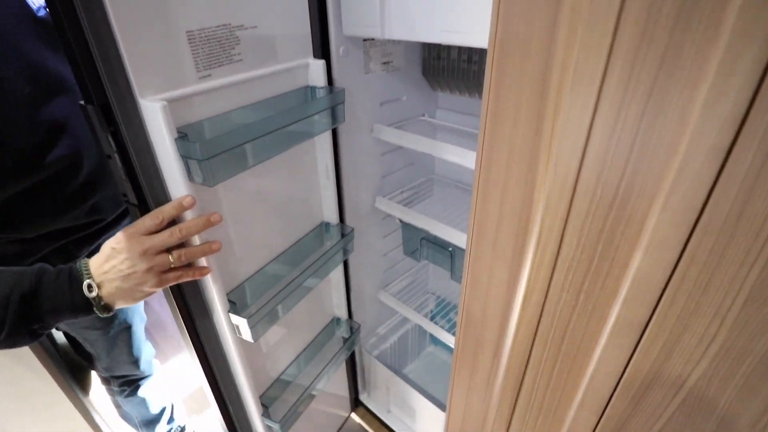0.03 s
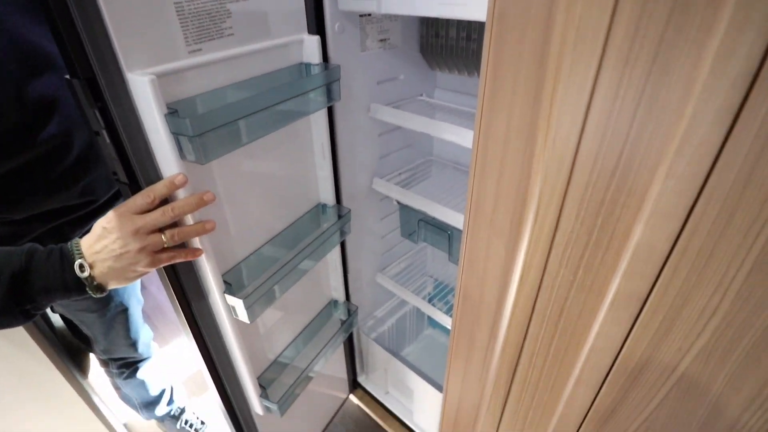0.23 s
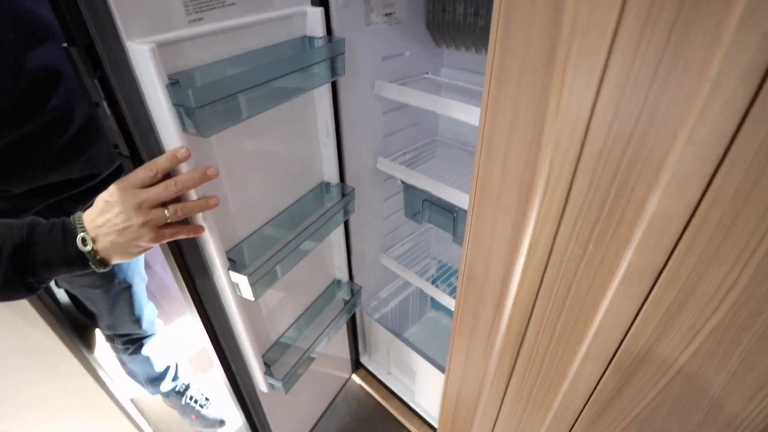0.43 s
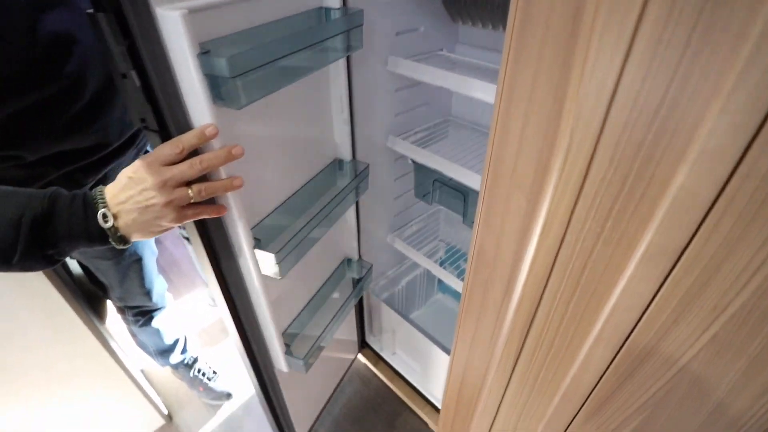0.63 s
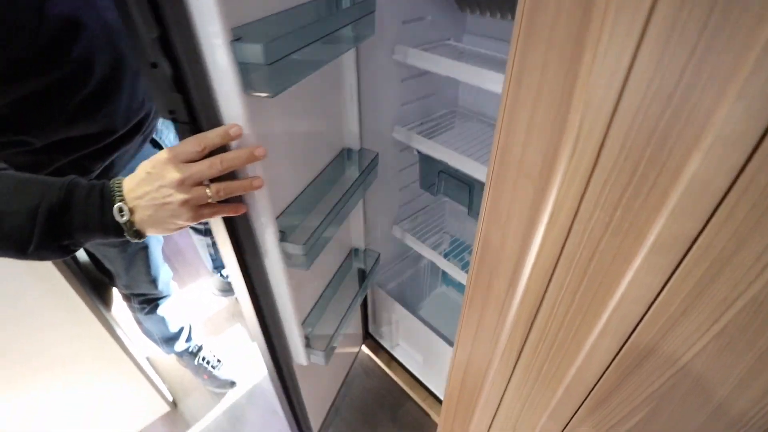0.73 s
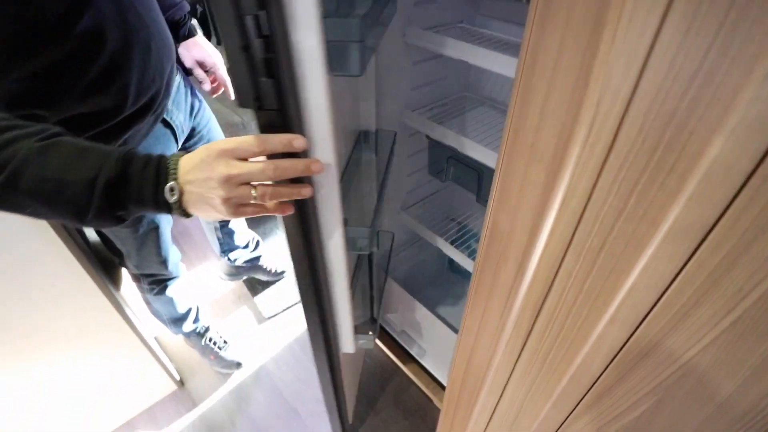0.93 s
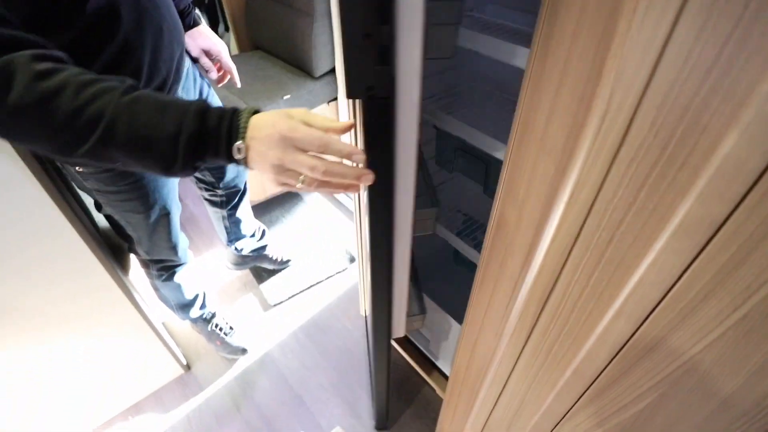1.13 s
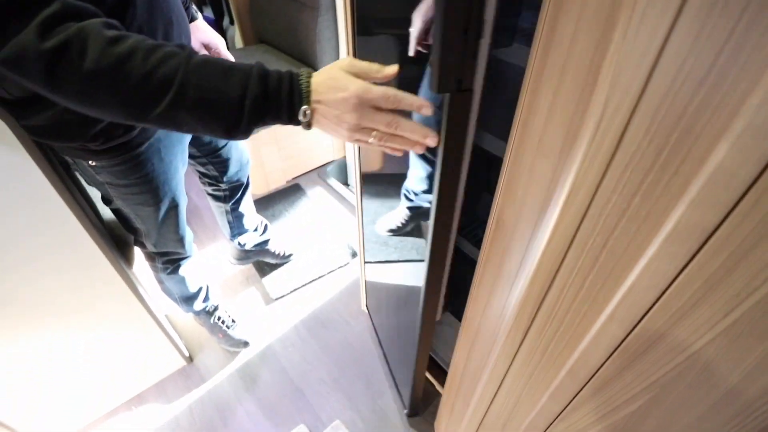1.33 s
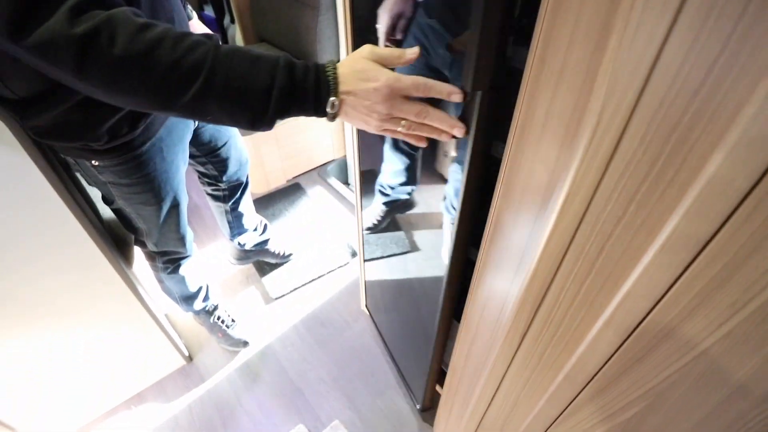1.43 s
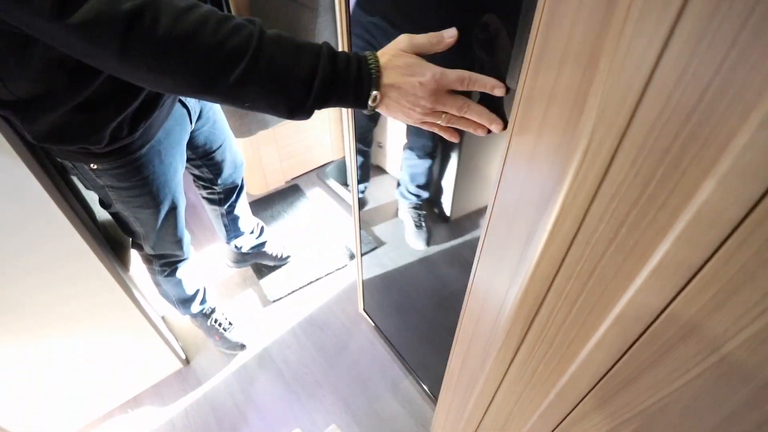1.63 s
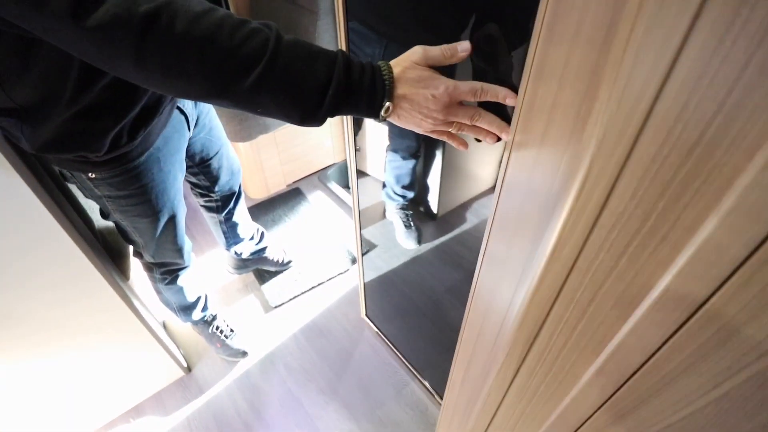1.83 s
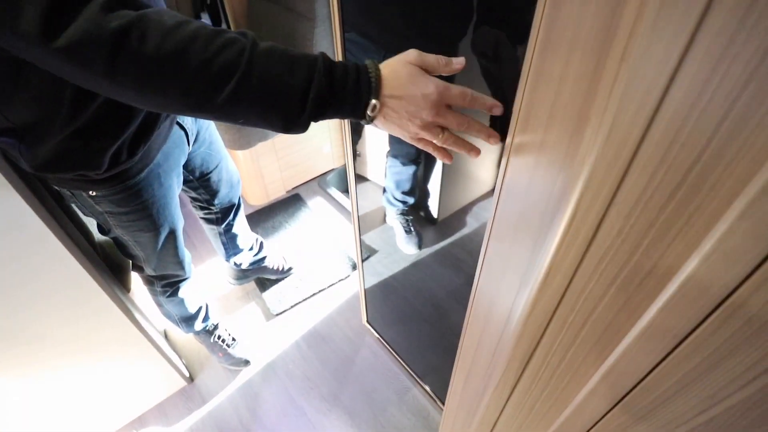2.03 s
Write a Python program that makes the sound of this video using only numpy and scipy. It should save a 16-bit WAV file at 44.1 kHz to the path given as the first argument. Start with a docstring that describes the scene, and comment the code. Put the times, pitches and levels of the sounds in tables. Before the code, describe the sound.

A refrigerator door is pushed shut in a quiet motorhome. Faint clothing rustle and small knocks come first, then the latch ticks and snaps home with a thud and brief shelf rattle, heard from close by.

```python
"""Clothing rustles, with faint knocks and a thin squeak, as a tall refrigerator door is pushed shut.
The latch ticks over its catch, the seal lands with a low thump, then the latch snaps home:
door panel and shelves ring and rattle, and the cabinet booms. A hand then rubs on the door.
Behind it all lies the low, steady background of a quiet, padded motorhome."""
import sys
import numpy as np
from scipy import signal
from scipy.io import wavfile

SR = 44100
rng = np.random.default_rng(int(sys.argv[2]) if len(sys.argv) > 2 else 0)


def unload_audio(sound):
    """Save the sound as a 16-bit wav file, at the path given as the first command line argument."""
    columns = np.transpose(np.atleast_2d(sound))
    # keep every value between -1 and 1, then stretch to whole-number steps
    steps = np.round(np.clip(columns, -1, 1) * 32767)
    wavfile.write(sys.argv[1], SR, steps.astype(np.int16))


N = 91639
TIME_S = np.arange(N) / SR

# Latch snap, door on frame, shelf rattle. Each row: start in seconds, noise level in dB,
# tilt about 1 kHz in dB per octave, ring pitch in Hz, ring level in dB.
BLOWS = [(1.8215, -11.5, 0.7, 2854, -19.5), (1.8250, -9, 0.98, 1228, -7.5), (1.8375, -15, -1.6, 689, -20),
         (1.8480, -20.5, 0.2, 548, -18.5), (1.8695, -24.5, 1, 448, -16)]
# Blow spectrum. Each row: frequency in Hz, relative density in dB.
BLOW_SPECTRUM = [(40, -32.5), (80, -13.5), (130, -14.5), (210, -9.5), (360, -14), (585, -8.5), (780, -12),
                 (1150, -9.5), (1550, -14.5), (2000, -17.5), (2500, -16), (3260, -16), (4500, -24.5),
                 (7300, -22), (8700, -23.5), (12400, -28), (15500, -37.5)]
# Decay in the cabin. Each row: frequency in Hz, T60 in seconds.
CABIN_DECAY = [(100, 0.7), (300, 0.29), (1000, 0.16), (3000, 0.19), (8000, 0.15), (15000, 0.079)]
# Door panel and shelf modes. Each row: frequency in Hz, level in dB, T60 in seconds.
DOOR_MODES = [(82.2, -28, 0.21), (138.7, -29.5, 0.38), (214, -18, 0.21), (280.2, -19.5, 0.19),
              (316.2, -25, 0.33), (359, -26, 0.24), (406.4, -25, 0.23), (441, -23.5, 0.26),
              (503, -22, 0.23), (596.5, -18, .18), (701, -23, 0.24), (1004, -26, 0.14), (1065, -20, 0.13),
              (1296, -21, 0.072), (2242, -30.5, 0.077), (2434, -22.5, 0.13), (3200, -31.5, 0.11),
              (3472, -31, .11)]
# Rubber seal thump. Each row: frequency in Hz, level in dB.
SEAL_MODES = [(150, -23.5), (210, -9), (345, -20.5)]
# Cabinet shudders. Each row: start in seconds, frequency in Hz, level in dB, T60 in seconds.
SHUDDERS = [(1.705, 56, -41.5, 0.65), (1.905, 44.9, -45.5, 0.27), (1.953, 46.5, -40.5, 0.32)]
# Latch knock at first touch. Each row: frequency in Hz, level in dB, T60 in seconds.
LATCH_MODES = [(179.7, -36.5, 0.097), (454, -32.5, 0.095), (544, -42.5, 0.063), (953, -32, .04),
               (1043, -30, 0.042), (1305, -34, .08), (1825, -40, 0.065), (2040, -48.5, .09)]
# Latch riding over its catch. Each row: start in seconds, noise level in dB,
# tilt about 1 kHz in dB per octave, ring pitch in Hz, ring level in dB.
TICKS = [(1.7048, -32.5, -.3, 1020, -36.5), (1.7432, -30, 0.6, 1180, -36),
         (1.7530, -30.5, 0.5, 1270, -38.5), (1.7605, -33, -2, 570, -27), (1.7781, -28, -0.9, 3280, -40),
         (1.7820, -27, -0.2, 1180, -27), (1.8050, -19.5, -1, 1400, -35)]
# Tick spectrum. Each row: frequency in Hz, relative density in dB.
TICK_SPECTRUM = [(40, -23), (80, -7), (190, -7), (330, -0.5), (440, -2.5), (580, -2), (760, -9), (1300, -8),
                 (1750, -16), (3400, -17), (4400, -27.5), (7000, -22), (15500, -43)]
# Hand rub envelope. Each row: time in seconds, level in dB.
RUB_ENVELOPE = [(1.92, -75), (1.98, -58.5), (2.03, -50), (2.06, -49), (2.075, -46)]
# Hand rub spectrum. Each row: frequency in Hz, relative density in dB.
RUB_SPECTRUM = [(71, -30), (120, -1.5), (330, -22), (420, -11), (546, -9.5), (668, -8), (1040, -16.5),
                (1410, -11), (15000, -44.5)]
# Arm taking hold. One row: start, attack, hold and release in seconds, level in dB.
RUSTLE_STROKE = (-.03, .03, .2, .15, -55.7)
# Cloth rustle spectrum. Each row: frequency in Hz, relative density in dB.
RUSTLE_SPECTRUM = [(60, 10), (150, 2), (300, 5), (450, -4), (800, 3), (1100, -2), (1400, 2), (1950, 1.5),
                   (2400, -3.5), (3100, -9.5), (4000, -20), (5100, -12), (5800, -8.5), (7100, -29),
                   (15000, -39)]
# Arm pushing. One row: start, attack, hold and release in seconds, level in dB.
SWISH_STROKE = (.8, .12, .14, .24, -59.7)
# Cloth swish spectrum. Each row: frequency in Hz, relative density in dB.
SWISH_SPECTRUM = [(700, -33), (1100, -1), (1400, 5.5), (1650, 8.5), (2050, -8), (2500, -14), (3200, -9.5),
                  (4600, -18), (6000, -15), (7600, -14.5), (10000, -26), (15000, -35)]
# Handling knocks. Each row: start in seconds, level in dB, band frequency in Hz, T60 in seconds.
KNOCKS = [(.275, -55, 328, 0.086), (.535, -53, 613, .15), (.674, -48.5, 340, .11), (.678, -51.5, 650, 0.25),
          (1.423, -52, 2620, .17)]
# Background spectrum. Each row: frequency in Hz, relative density in dB.
AIR_SPECTRUM = [(25, -26), (45, -12), (70, 2), (105, -1), (135, -7), (200, -3.5), (260, -7.5), (380, -9),
                (720, -7), (1050, -18), (1700, -18.5), (2600, -20.5), (3700, -30), (6400, -39.5),
                (9000, -47), (16000, -53)]
# Cabin resonances. Each row: frequency in Hz, width in Hz, level in dB.
CABIN_MODES = [(173.7, 20.4, -61), (310.6, 24, -62.5), (442, 26, -63)]


def door(seal_s=1.804, hit_s=1.8255, seated_s=1.88, build_cycles=2.8, damping_db=-5.5, damping_s=0.046):
    """The seal lands; the hard blow rattles and rings the panel until the squeezed seal damps it."""
    seal = -sum(mode(seal_s, hz, db, attack_s=0.0019, hold_s=0.0054, t60_s=0.034)
                for hz, db in SEAL_MODES)
    clack = impacts(BLOWS, BLOW_SPECTRUM, crack_t60_s=0.026, tail_db=-7.5,
                    tail_t60_s=lambda hz: at_hz(CABIN_DECAY, hz))
    panel = sum((-1) ** k * mode(hit_s, hz, db, attack_s=build_cycles / hz, hold_s=0.0077, t60_s=t60_s)
                for k, (hz, db, t60_s) in enumerate(DOOR_MODES))
    damping = from_db(damping_db * np.clip((TIME_S - seated_s) / damping_s, 0, 1))
    return seal + (clack + rings(BLOWS, t60_s=0.041) + panel) * damping


def cabinet():
    """The blow drives a deep boom of a few cycles; weaker shudders come at first touch and after."""
    boom = -mode(start_s=1.8255, hz=48.7, db=-19.5, attack_s=0.023, hold_s=0.027, t60_s=0.11)
    shudders = sum(mode(start_s, hz, db, attack_s=0.015, hold_s=0.036, t60_s=t60_s)
                   for start_s, hz, db, t60_s in SHUDDERS)
    return boom + shudders


def latch(touch_s=1.7043):
    """A hollow knock on the catch, then plastic ticks as the latch is pressed back."""
    knock = -sum(mode(touch_s, hz, db, attack_s=0.00064, hold_s=0, t60_s=t60_s)
                 for hz, db, t60_s in LATCH_MODES)
    ticks = impacts(TICKS, TICK_SPECTRUM, crack_t60_s=0.024, tail_db=-5, tail_t60_s=lambda hz: 0.22)
    return knock + ticks + rings(TICKS, t60_s=0.026)


def hand():
    """A palm rubs over the closed door."""
    times_s, levels_db = np.transpose(RUB_ENVELOPE)
    envelope = (TIME_S > times_s[0]) * from_db(np.interp(TIME_S, times_s, levels_db))
    return envelope * noise(RUB_SPECTRUM, waver_db=5.5)


def clothing():
    """Cloth slides on cloth as the arm takes hold, then pushes."""
    rustle = stroke(*RUSTLE_STROKE) * noise(RUSTLE_SPECTRUM, waver_db=2.0)
    swish = stroke(*SWISH_STROKE) * noise(SWISH_SPECTRUM, waver_db=0.7)
    return rustle + swish


def squeak(start_s=1.247, length_s=0.118, level_db=-73,
           top_s=1.297, top_hz=8550, bend_hz_per_s2=150000, jitter_hz=30):
    """A thin, unsteady tone, perhaps the hinge, arches in pitch as the door swings."""
    hz = top_hz - bend_hz_per_s2 * (TIME_S - top_s) ** 2 + jitter_hz * wander(step_s=0.002)
    progress = np.clip((TIME_S - start_s) / length_s, 0, 1)
    return from_db(level_db) * np.sin(np.pi * progress) * np.sin(2 * np.pi * np.cumsum(hz) / SR)


def handling_knocks():
    """Faint knocks during the swing, each a decaying band of noise."""
    out = 0
    for start_s, db, hz, t60_s in KNOCKS:
        body = signal.butter(2, [hz / 1.42, hz * 1.27], "band", fs=SR, output="sos")
        white = rng.standard_normal(N)
        knock = signal.sosfilt(body, decay(start_s, t60_s) * white + 1e-18)
        out += from_db(db) * knock / signal.sosfilt(body, white).std()
    return out


def cabin(air_db=-53.5):
    """Steady background noise, coloured by boxy cabin resonances."""
    out = from_db(air_db) * noise(AIR_SPECTRUM, waver_db=1.3)
    for hz, width_hz, db in CABIN_MODES:
        resonator = signal.iirpeak(hz, hz / width_hz, fs=SR)
        drone = signal.lfilter(*resonator, rng.standard_normal(N))
        out += from_db(db) * drone / drone.std()
    return out


def impacts(contacts, spectrum, crack_t60_s, tail_db, tail_t60_s):
    """Each contact is a short crack plus a tail of dense resonances; tail_t60_s is a function of Hz."""
    out = 0
    for hz, sos, gain in bands(spectrum):
        octaves = np.log2(hz / 1000)
        power = 0
        for start_s, db, tilt_db_per_octave, _, _ in contacts:
            crack = decay(start_s, crack_t60_s)
            tail = from_db(tail_db) * decay(start_s, tail_t60_s(hz))
            power += from_db(db + tilt_db_per_octave * octaves) ** 2 * (crack ** 2 + tail ** 2)
        excitation = np.sqrt(power) * rng.choice([-1, 1], N)
        out += gain * signal.sosfilt(sos, excitation + 1e-18)  # offset avoids denormals
    return out


def rings(contacts, t60_s):
    """Each struck part rings briefly at its own pitch."""
    return sum(mode(start_s, hz, db, attack_s=0.0012, hold_s=0.002, t60_s=t60_s)
               for start_s, _, _, hz, db in contacts)


def mode(start_s, hz, db, attack_s, hold_s, t60_s):
    """A sine vibration: linear rise, hold, exponential fall."""
    age_s = np.maximum(TIME_S - start_s, 0)
    rise = np.minimum(age_s / attack_s, 1)
    fall = from_db(-60 * np.maximum(age_s - attack_s - hold_s, 0) / t60_s)
    return from_db(db) * rise * fall * np.sin(2 * np.pi * hz * age_s)


def stroke(start_s, attack_s, hold_s, release_s, db):
    """Trapezoid envelope of one arm movement."""
    rise = (TIME_S - start_s) / attack_s
    fall = 1 - (TIME_S - start_s - attack_s - hold_s) / release_s
    return from_db(db) * np.clip(np.minimum(rise, fall), 0, 1)


def decay(start_s, t60_s):
    """Zero until the start, then an exponential fall."""
    return (TIME_S >= start_s) * from_db(-60 * np.maximum(TIME_S - start_s, 0) / t60_s)


def noise(spectrum, waver_db):
    """Coloured noise whose bands waver independently in level."""
    out = 0
    for _, sos, gain in bands(spectrum):
        band = gain * signal.sosfilt(sos, rng.standard_normal(N))
        out += band * from_db(waver_db * wander(step_s=0.06))
    return out


def wander(step_s):
    """Gaussian random points joined by straight lines."""
    knots_s = np.arange(0, N / SR + step_s, step_s)
    return np.interp(TIME_S, knots_s, rng.standard_normal(len(knots_s)))


def bands(spectrum):
    """Third-octave (Hz, filter, gain) sets that shape white noise to the spectrum at rms near 1."""
    edges_hz = 22 * 2 ** (np.arange(30) / 3)
    centres_hz = np.sqrt(edges_hz[1:] * edges_hz[:-1])
    gains = from_db(at_hz(spectrum, centres_hz))
    gains /= np.sqrt(np.sum(gains ** 2 * np.diff(edges_hz)) * 2 / SR)
    filters = [signal.butter(2, pair, "band", fs=SR, output="sos")
               for pair in zip(edges_hz, edges_hz[1:])]
    return zip(centres_hz, filters, gains)


def at_hz(table, hz):
    """Interpolate on a log-frequency axis."""
    knots_hz, values = np.transpose(table)
    return np.interp(np.log(hz), np.log(knots_hz), values)


def from_db(db):
    """Decibels to gain."""
    return 10 ** (np.asarray(db) / 20)


def scene():
    """All sources at one close microphone."""
    mix = clothing() + squeak() + latch() + door() + cabinet() + hand() + cabin() + handling_knocks()
    return mix[None]


def record(dry, ceiling=0.75, cutoff_hz=15800):
    """Soft clip, then a steep low-pass."""
    lowpass = signal.cheby1(12, 0.2, cutoff_hz, fs=SR, output="sos")
    return signal.sosfilt(lowpass, ceiling * np.tanh(dry / ceiling))


dry = scene()
out = record(dry)
unload_audio(out)
```